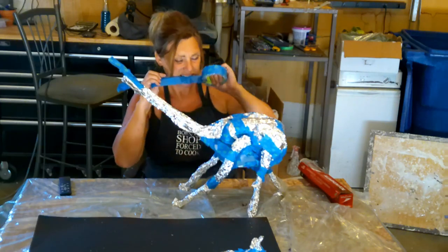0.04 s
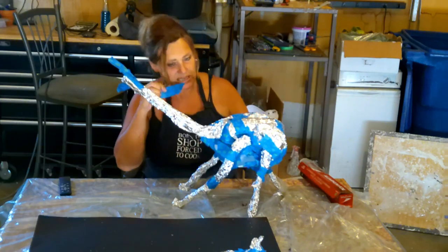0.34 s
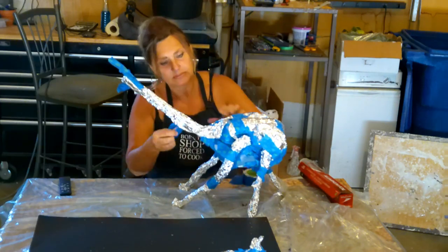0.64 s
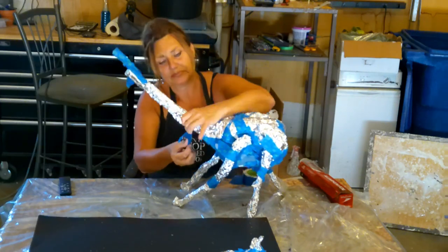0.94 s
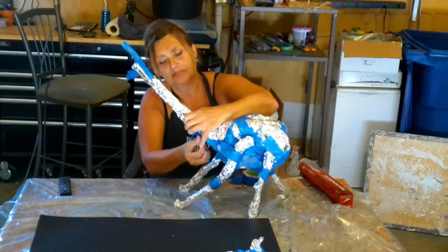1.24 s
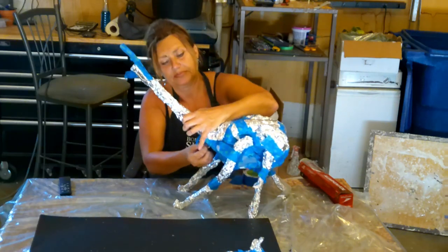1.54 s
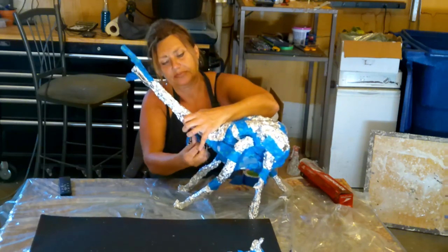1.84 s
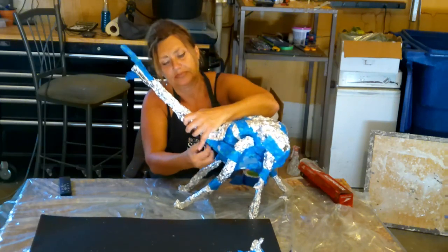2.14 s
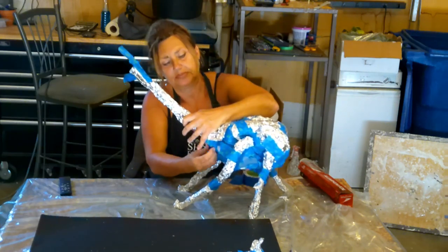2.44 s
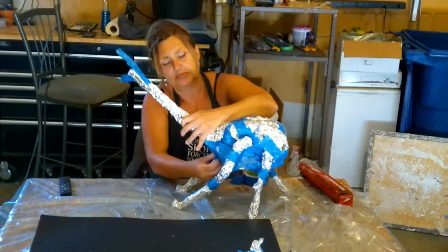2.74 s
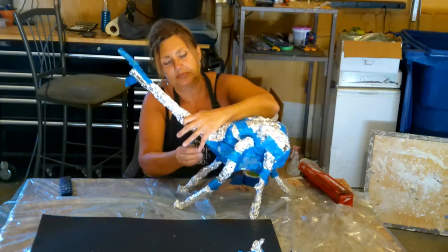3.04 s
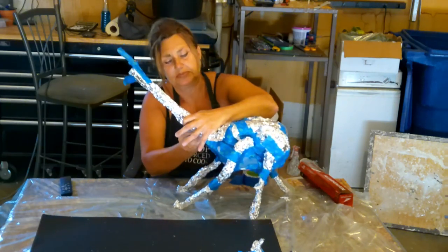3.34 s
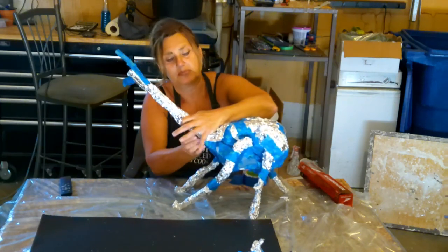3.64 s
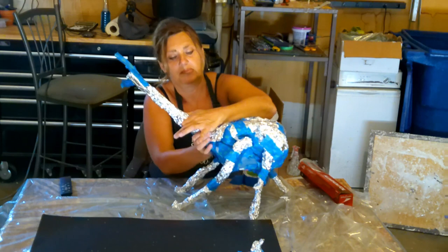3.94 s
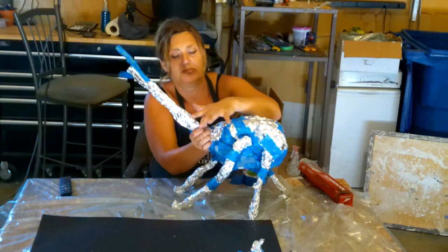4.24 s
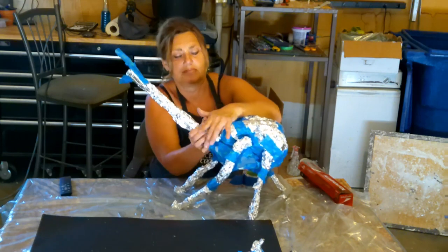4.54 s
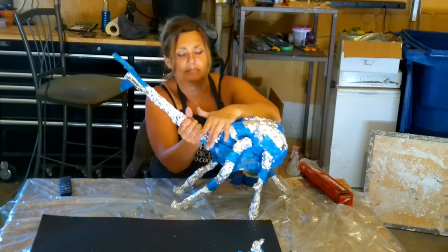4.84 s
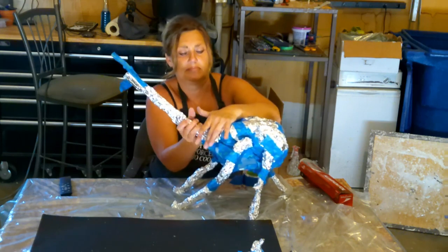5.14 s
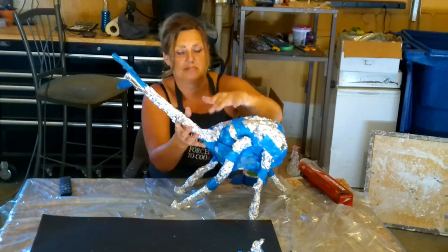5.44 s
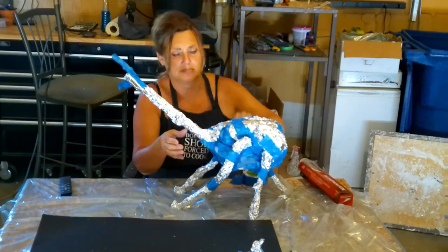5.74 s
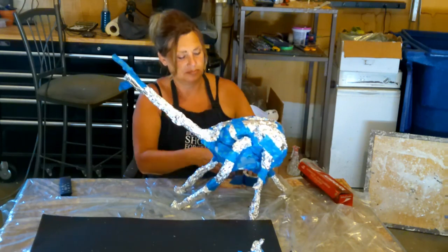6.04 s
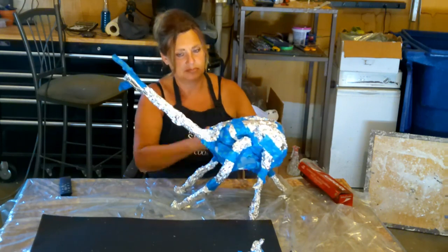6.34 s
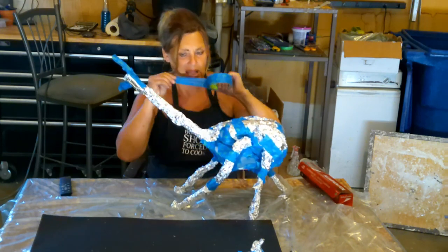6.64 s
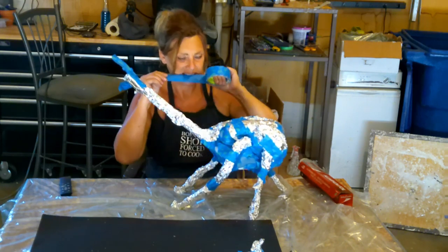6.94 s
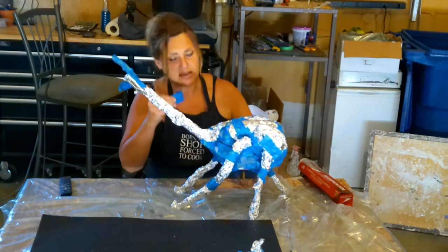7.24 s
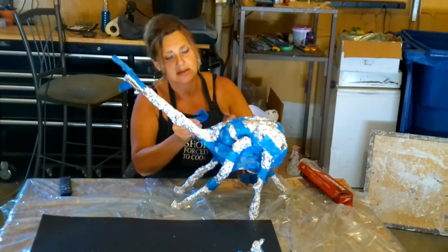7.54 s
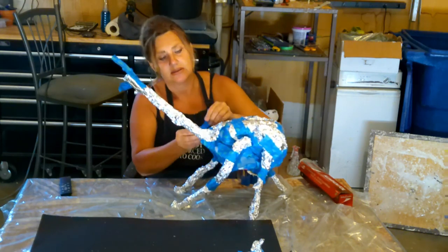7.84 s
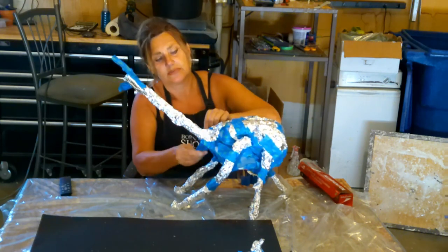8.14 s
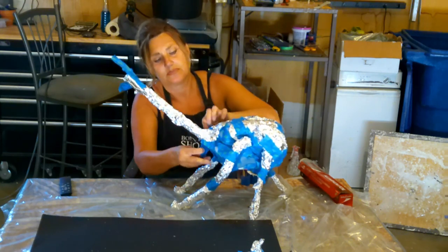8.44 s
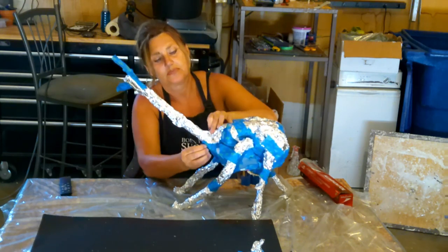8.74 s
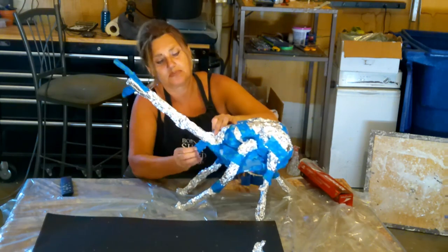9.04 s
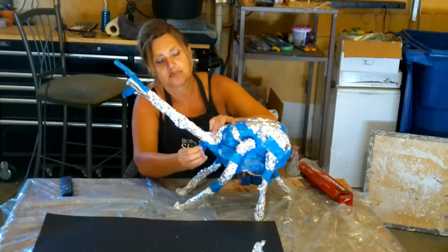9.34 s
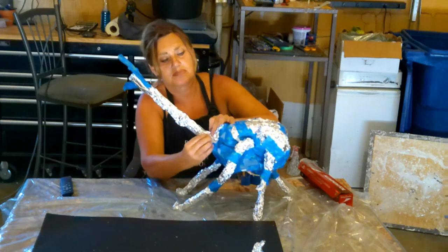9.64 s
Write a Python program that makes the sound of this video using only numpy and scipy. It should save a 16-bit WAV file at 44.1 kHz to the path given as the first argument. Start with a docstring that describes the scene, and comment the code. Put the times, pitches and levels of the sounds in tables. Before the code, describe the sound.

A quiet, echoing workshop is heard from close to the work table, with faint hiss, hum and a low electrical flutter throughout. At about 0.2 seconds masking tape tears with a brief, crisp rip. At 0.5 seconds the roll hits the table with a very loud double knock that overloads the microphone. From 1 to 5.5 seconds fingers press and rub tape onto a foil sculpture, giving faint, irregular crinkles, small sharp snaps and occasional soft, hollow bumps. A few more bumps come around 6 seconds. At 6.5 seconds tape unwinds in one short rasp, then tears just after 7 seconds. From 7.4 to 7.8 seconds the roll drops again, bouncing loudly several times and briefly ringing the tabletop. Soft crinkling, rubbing and ticking resume from 8 seconds until the end near 10, with a sharper snap and a bump at 9.

```python
"""A quiet, echoing workshop, one microphone close to the work table. Masking tape is pulled off its
roll as the glue slips, torn across as its fibres break, and pressed onto a foil sculpture that crinkles,
snaps and bumps under the hands. Twice the roll is dropped on the table, where it bounces, rings the top
and overloads the microphone. Under it all lie faint room noise and the camera's own electrical flutter."""
import sys
import numpy as np
from scipy import signal
from scipy.fft import rfft, irfft, next_fast_len
from scipy.io import wavfile

SR = 44100
rng = np.random.default_rng(int(sys.argv[2]) if len(sys.argv) > 2 else 0)


def bounce(signal):
    """Save signal as a 16-bit WAV file at the path given by the first command-line argument."""
    frames = np.transpose(np.atleast_2d(signal))
    limited = np.clip(frames, -1, 1)
    pcm = np.round(limited * 32767).astype(np.int16)
    wavfile.write(sys.argv[1], SR, pcm)


N = 435708

# Levels are relative within each layer.
# the workshop's reverberation: f/Hz, t60/s
ROOM_DECAY = [(100, 0.89), (500, 0.57), (1500, 0.67), (4000, 0.64), (8000, 0.55), (15000, 0.37)]
# room noise and hiss: f/Hz, level/dB
AIR_COLOUR = [(12, -38), (20, -3), (32, -38.5), (55, -13), (100, -19.5), (190, -24), (300, -29),
              (430, -30.5), (600, -32.5), (980, -34.5), (1700, -43), (4000, -51), (10000, -53.5),
              (16000, -56)]
# the camera's low electrical hum and a distant motor: f/Hz, level/dB, fade/(dB/s)
HUM_TONES = [(59.9, -49.5, 1.3), (585, -63.5, 0)]
# the camera's electrical pulse: f/Hz, level/dB
FLUTTER_COLOUR = [(15, 1.5), (30, 3.5), (60, -13), (90, -2), (150, 1.5), (240, -4), (280, -8.5), (480, -16),
                  (700, -20.5), (3000, -49.5)]
# fingers press tape onto the foil: t/s, hold/s, crinkle/dB, rubbing/dB
FINGER_PRESSES = [(0.04, 0.045, -51, -45.5), (0.141, 0.028, -49.5, -54.5), (0.938, 0.17, -43, -49),
                  (1.58, 0.15, -51, -50), (2.09, 0.13, -53, -60), (2.277, 0.035, -44, -45.5),
                  (2.495, 0.095, -49.5, -58), (2.72, 0.038, -48.5, -46), (2.889, 0.039, -45.5, -47),
                  (3.262, 0.061, -53, -69), (3.53, 0.035, -47.5, -54), (3.679, 0.048, -43.5, -48),
                  (3.882, .1, -49, -52), (4.06, 0.28, -43.5, -51), (4.139, 0.079, -46, -41.5),
                  (4.566, 0.15, -48, -53), (4.815, 0.13, -45.5, -55), (5.149, 0.051, -48, -50),
                  (5.307, 0.035, -53, -54), (6.188, 0.029, -54, -44.5), (7.0, 0.11, -48.5, -49),
                  (8.008, 0.047, -53, -52), (8.206, 0.025, -54.5, -51), (8.442, 0.063, -46, -48),
                  (8.62, 0.42, -49.5, -54), (9.013, 0.15, -45, -40.5), (9.416, 0.046, -53.5, -57),
                  (9.597, 0.072, -43, -52.5), (9.77, 0.035, -49, -58)]
# a hand rests on the sculpture and stirs faintly: t/s, hold/s, crinkle/dB, rubbing/dB
RESTING_GRIPS = [(0.95, 3.1, -61, -62.5), (7.8, 2.5, -58.5, -59.5)]
# crinkling foil: f/Hz, level/dB
CRINKLE_COLOUR = [(880, -39), (1500, -9.5), (2340, -2.5), (3120, -1), (4040, -4.5), (6240, -3.5),
                  (10100, -6.5), (15100, -11), (16000, -40)]
# fingers sliding over tape: f/Hz, level/dB
FINGER_COLOUR = [(200, -29), (500, -4), (1300, 0), (2300, -7), (4000, -12.5), (9000, -31)]
# a foil crease, which gives no bass: f/Hz, level/dB
CREASE_COLOUR = [(500, -54), (1500, 9), (2800, 5.5), (11000, 6.5), (13500, -1), (16000, -8)]
# the tape tears across: t/s, length/s, level/dB
TAPE_TEARS = [(0.2318, 0.0011, -19), (0.234, 0.017, -26), (0.2548, 0.014, -21), (7.0692, .007, -22),
              (7.077, 0.0057, -18.5)]
# a breaking paper fibre: f/Hz, level/dB
FIBRE_COLOUR = [(200, -26), (400, -9), (750, -5.5), (1300, -15.5), (2200, -10.5), (4600, -6.5), (6200, -7),
                (9500, -5), (12500, -8.5), (16000, -20)]
# the taut strip and its roll ring: f/Hz, sharpness, lift/dB
STRIP_MODES = [(811, 6, 5), (1850, 18, 5.5), (2290, 16, 5.5), (3370, 16, 3.5), (4660, 12, 2), (7150, 20, 3)]
# the strongest creases snap: t/s, level/dB, centre f/Hz
CREASE_SNAPS = [(0.4573, -24, 3500), (0.9845, -21.5, 5590), (1.1678, -26, 7410), (2.2736, -24.5, 4980),
                (2.7004, -18.5, 7100), (3.6732, -27, 8950), (3.6877, -18.5, 8200), (3.8174, -26.5, 4275),
                (3.9098, -30, 5000), (4.2505, -24.5, 6340), (4.418, -27.5, 6000), (4.5961, -26, 7500),
                (4.7987, -22.5, 3580), (5.1372, -31, 3500), (5.2972, -31.5, 4480), (8.217, -24.5, 5400),
                (8.44, -26.5, 6500), (8.846, -22.5, 6470), (9.024, -16.5, 4020), (9.58, -27.5, 4420)]
# the roll hits the table: t/s, level/dB, contact cut-off f/Hz, hard edge/dB, room/dB
ROLL_BOUNCES = [(0.4726, 1.5, 720, -20, 3), (0.521, 8, 2760, -9, -3), (7.374, -3.5, 950, -16, 5),
                (7.4045, -8, 3040, -16, -4.5), (7.51, -12.5, 1300, -21, 2.5), (7.5237, 0, 1025, -17, -2),
                (7.645, -11.5, 687, -17.5, 2), (7.679, -9.5, 845, -32, -3),
                (7.7826, -23.5, 614, -30, -13.5)]
# table top and roll ring together: f/Hz, level/dB, t60/s
TABLE_MODES = [(140.4, -24.5, 0.3), (195, -18.5, 0.21), (273, -16, 0.12), (495.2, -1, 0.063),
               (632, -17.5, 0.18), (628, -11.5, 0.038), (761, -3, 0.061), (805, -9, 0.2), (1079, 0, 0.022),
               (1127, -6, 0.059), (1332, -4, 0.063), (1350, -15, 0.07), (1532, 3, 0.0096),
               (1800, -10, 0.075), (1954, -8.5, 0.03), (2484, -6.5, 0.038), (2560, -20, 0.047),
               (2997, -8.5, 0.02)]
# the blow itself: f/Hz, level/dB
THUD_COLOUR = [(80, -6), (250, 6.5), (380, -13), (700, -2), (1400, -27), (2500, -9), (3450, -10),
               (4000, -46), (8000, -63), (16000, -68)]
# what the table sends into the room: f/Hz, level/dB
CLATTER_COLOUR = [(80, -17), (250, -24.5), (400, -3), (760, -3.5), (1500, -1), (2500, -4.5), (3400, -8.5),
                  (4100, -14.5), (6000, -24.5), (9000, -29), (16000, -54)]
# soft handling bumps: t/s, level/dB
HAND_BUMPS = [(1.049, -29), (2.588, -29), (2.705, -28.5), (3.055, -33), (4.249, -26.5), (5.05, -33.5),
              (5.975, -29), (6.028, -33.5), (6.159, -27.5), (9.025, -24), (9.15, -31)]
# the sculpture's hollow body: f/Hz, level/dB
BODY_COLOUR = [(90, -67), (220, 8), (480, 12), (800, 1.5), (1400, -3.5), (3000, -30), (8000, -45)]
# a small stiff part ticks: t/s, level/dB
STIFF_TICKS = [(2.0920, -29), (2.244, -25), (8.501, -32.5)]
# the tape unwinds, creeping first, then in one yank: t/s, hold/s, level/dB
TAPE_PULLS = [(6.44, .1, -47), (6.605, 0.042, -29.5)]
# glue letting go of the roll: f/Hz, level/dB
GLUE_COLOUR = [(200, -35), (380, -15.5), (540, -4.5), (780, -8.5), (1300, -17), (2500, -16.5), (4200, -20),
               (7200, -22.5), (12500, -26), (16000, -36)]


def amp(db):
    """Decibels to gain."""
    return 10 ** (np.asarray(db) / 20)


def unit(x):
    """Scale to rms 1."""
    return x / np.sqrt(np.mean(x ** 2) + 1e-20)


def along(points, hz):
    """Read (f/Hz, value) points on a log axis."""
    f, v = np.transpose(points)
    return np.interp(np.log(hz + 1), np.log(f + 1), v)


def add(track, s, sound):
    """Mix a sound into a track at s seconds."""
    part = track[max(round(s * SR), 0):][:len(sound)]
    part += sound[:len(part)]


def shaped(x, gain):
    """Causal (minimum-phase) filter with a given gain over frequency."""
    size = 2 * next_fast_len(len(x) // 2 + 4096)
    cepstrum = irfft(np.log(np.maximum(gain(np.fft.rfftfreq(size, 1 / SR)), 1e-6)))
    cepstrum[1:size // 2] *= 2
    cepstrum[size // 2 + 1:] = 0
    return irfft(rfft(x, size) * np.exp(rfft(cepstrum)))[:len(x)]


def coloured(x, points):
    """Filter x by a curve of (f/Hz, level/dB) points."""
    return shaped(x, lambda f: amp(along(points, f)))


def resonance(hz, centre_hz, sharpness):
    """Gain of one resonance."""
    return 1 / np.hypot(1, sharpness * (hz / centre_hz - centre_hz / (hz + 1)))


def ping(gain):
    """One sharp pulse with a given gain over frequency, energy 1."""
    x = shaped(signal.unit_impulse(SR // 8), gain)
    return x / np.linalg.norm(x)


def burst(t60):
    """A puff of noise that dies away."""
    t = np.arange(SR // 8) / SR
    return rng.standard_normal(len(t)) * amp(-60 * t / t60)


def slips(per_second, spread_db, size=N):
    """Tiny releases at random moments, of unequal strength."""
    happens = rng.random(size) < per_second / SR
    return happens * rng.choice([-1, 1], size) * amp(spread_db * np.clip(rng.standard_normal(size), -2, 2))


def strokes(rows, rise_s=0.048, fall_s=0.1, column=2):
    """Gain of hand movements that swell 20 dB per rise_s, hold, then fade 20 dB per fall_s."""
    t = np.arange(0, N, 64) / SR
    power = np.zeros(len(t))
    for row in rows:
        start, hold = row[:2]
        away = np.maximum(start - t, 0) / rise_s + np.maximum(t - start - hold, 0) / fall_s
        power += amp(row[column] - 20 * away) ** 2
    return np.interp(np.arange(N) / SR, t, np.sqrt(power))


def echo(x, build_s=0.0015, air_hz=12000):
    """The workshop's diffuse answer builds up, is duller than the source and dies faster in the treble."""
    hz, t, noise = signal.stft(rng.standard_normal(SR), SR, nperseg=256)
    air_loss = 1 / np.sqrt(1 + (hz[:, None] / air_hz) ** 6)
    decay = amp(-60 * t / along(ROOM_DECAY, hz)[:, None])
    tail = signal.istft(noise * air_loss * decay, SR, nperseg=256)[1]
    tail *= 1 - np.exp(-(np.arange(len(tail)) / SR / build_s) ** 2)
    return signal.fftconvolve(x, tail / np.linalg.norm(tail))


def in_room(x, wet_db):
    """The direct sound at the microphone plus its echo."""
    out = amp(wet_db) * echo(x)
    add(out, 0, x)
    return out


def click(t60, gain, wet_db):
    """A short filtered burst of peak 1; its energy echoes on evenly."""
    direct = shaped(burst(t60), gain)
    direct /= np.abs(direct).max()
    out = amp(wet_db) * np.linalg.norm(direct) * echo(ping(gain))
    add(out, 0, direct)
    return out


def room_tone():
    """Steady room noise and hiss, a distant motor, and the camera's low electrical hum, slowly fading."""
    t = np.arange(N) / SR
    out = amp(-42) * unit(coloured(rng.standard_normal(N), AIR_COLOUR))
    for hz, db, fade in HUM_TONES:
        tone = np.sqrt(2) * np.sin(2 * np.pi * (hz * t + rng.random()))
        out += amp(db - fade * (t - t.mean())) * tone
    return out


def camera_flutter(frame_hz=30.022):
    """The camera gives a soft electrical pulse at every picture frame."""
    t = np.arange(N) / SR
    pulses = np.diff(np.floor((t - 0.003) * frame_hz), prepend=-1)
    return amp(-42) * unit(coloured(pulses - pulses.mean(), FLUTTER_COLOUR))


def drone(centre_hz=415):
    """A faint hollow drone wavers in the room."""
    band = shaped(rng.standard_normal(N), lambda f: resonance(f, centre_hz, sharpness=2.7) ** 2)
    return amp(-54) * unit(band)


def pressed_foil():
    """Pressed foil crinkles in fine grains and sparser crackles while the fingers slide over the tape."""
    pressure = strokes(RESTING_GRIPS + FINGER_PRESSES)
    sliding = strokes(RESTING_GRIPS + FINGER_PRESSES, column=3)
    crinkle = in_room(pressure * unit(coloured(slips(1200, spread_db=0.5), CRINKLE_COLOUR)), wet_db=-8)
    crackle = in_room(pressure * unit(coloured(slips(45, spread_db=6.5), CRINKLE_COLOUR)), wet_db=1)
    rub = in_room(sliding * unit(coloured(slips(600, spread_db=3), FINGER_COLOUR)), wet_db=-3.5)
    return (amp(-2) * crinkle + amp(-10) * crackle + amp(-4) * rub)[:N]


def small_creases(count=130, centre_hz=6000, spread_octaves=0.66, spread_db=3):
    """Lesser creases tick at random, each at its own pitch, more often and louder under a firm press."""
    pressure = strokes(RESTING_GRIPS + FINGER_PRESSES)
    chance = np.cumsum(np.sqrt(pressure))
    moments = np.searchsorted(chance, chance[-1] * rng.random(count))
    scatter = np.clip(rng.standard_normal((count, 2)), -2, 2)
    out = np.zeros(N)
    for i, (size, pitch) in zip(moments, scatter):
        hz = centre_hz * 2 ** (spread_octaves * pitch)
        crease = lambda f: resonance(f, hz, sharpness=1.55) * amp(along(CREASE_COLOUR, f))
        tick = shaped(burst(t60=0.0046), crease)
        strength = amp(-28 + spread_db * size) * (pressure[i] / pressure.max()) ** 0.73
        add(out, i / SR, strength * tick / np.abs(tick).max())
    return in_room(out, wet_db=-3.5)[:N]


def tape_tears(wet_db=-1.5):
    """Paper fibres break in brief, dense runs; the room smooths them to a hiss."""
    out = np.zeros(N)
    lift_db = lambda f: sum(db * resonance(f, hz, q) ** 2 for hz, q, db in STRIP_MODES)
    fibre = ping(lambda f: amp(along(FIBRE_COLOUR, f) + lift_db(f)))
    for s, length, db in TAPE_TEARS:
        size = int(length * SR)
        breaks = slips(9000, spread_db=4, size=size)
        breaks /= np.linalg.norm(breaks) + 1e-9
        strength = amp(db) * np.sqrt(size)
        add(out, s, strength * signal.fftconvolve(breaks, fibre))
        add(out, s, strength * amp(wet_db) * echo(fibre, build_s=size / SR))
    return out


def crease_snaps(lag_s=0.015):
    """A strong crease snaps and sets off three weaker ones just after it."""
    out = np.zeros(N)
    for s, db, hz in CREASE_SNAPS:
        crease = lambda f: resonance(f, hz, sharpness=0.65) * amp(along(CREASE_COLOUR, f))
        snap = amp(db + 1) * click(t60=0.011, gain=crease, wet_db=-4.5)
        add(out, s, snap)
        for delay, after_db in zip(rng.uniform(0, lag_s, size=3), rng.normal(-11, 1.8, size=3)):
            add(out, s + delay, amp(after_db) * snap[:SR // 200])
    return out


def roll_drops():
    """Each bounce thuds and rings the table; the flat side lands softly, the hard core brightly."""
    out, t = np.zeros(N), np.arange(SR // 3) / SR
    hz, db, t60 = np.transpose(TABLE_MODES)[:, :, None]
    thud = ping(lambda f: amp(along(THUD_COLOUR, f)))
    clatter = ping(lambda f: amp(along(CLATTER_COLOUR, f)))
    for s, blow_db, contact_hz, edge_db, wet_db in ROLL_BOUNCES:
        mode_db = db + rng.standard_normal(db.shape)  # every bounce lands on another spot
        modes = amp(mode_db - 60 * t / t60) * np.sin(2 * np.pi * hz * t)
        modes[1::2] *= -1  # neighbours swing in opposite senses
        direct = amp(-2) * modes.sum(axis=0)
        # the whole table radiates into the room, more evenly than its few strong modes
        radiated = amp(-9) * direct
        add(radiated, 0, amp(16) * clatter)
        add(direct, 0, amp(-4) * thud / np.abs(thud).max())
        knock = amp(wet_db) * echo(radiated, build_s=0.017)
        add(knock, 0, direct)
        add(knock, 0.008, amp(-7) * direct)  # first reflection, off the floor
        # a hard edge lets treble through
        contact = lambda f: np.maximum(1 / np.sqrt(1 + (f / contact_hz) ** 5.9), amp(edge_db))
        add(out, s, amp(blow_db) * shaped(knock, contact))
    return out


def hand_bumps():
    """Hands bump softly against the sculpture's hollow body."""
    out = np.zeros(N)
    body = lambda f: amp(along(BODY_COLOUR, f))
    for s, db in HAND_BUMPS:
        add(out, s, amp(db - 2) * click(t60=0.06, gain=body, wet_db=-1.5))
    return out


def stiff_ticks():
    """A small stiff part ticks, ringing briefly at one pitch."""
    out = np.zeros(N)
    ring = lambda f: resonance(f, centre_hz=2480, sharpness=3.6) ** 2
    for s, db in STIFF_TICKS:
        add(out, s, amp(db + 1) * click(t60=0.0041, gain=ring, wet_db=-1))
    return out


def tape_pull():
    """The glue lets go of the roll in countless little slips."""
    releases = coloured(slips(2500, spread_db=4), GLUE_COLOUR)
    rasp = unit(in_room(releases, wet_db=-0.5)[:N])
    return strokes(TAPE_PULLS, rise_s=0.11, fall_s=0.21) * rasp


def scene():
    """Everything at one microphone: the work close by, the room behind it."""
    tape = roll_drops() + tape_tears() + tape_pull()
    sculpture = pressed_foil() + small_creases() + crease_snaps() + stiff_ticks() + hand_bumps()
    background = room_tone() + camera_flutter() + drone()
    return (tape + sculpture + background)[None]


def record(dry, offset=-0.08, top_hz=16000):
    """The converter sits slightly off centre, clips at full scale and cuts the top treble."""
    clipped = np.clip(dry + offset, -1, 1)
    size = next_fast_len(N + SR // 4)
    padded = np.pad(clipped, ((0, 0), (0, size - N)), mode="edge")
    passband = np.fft.rfftfreq(size, 1 / SR) < top_hz
    return irfft(rfft(padded) * passband, size)[:, :N]


dry = scene()
out = record(dry)
bounce(out)
```